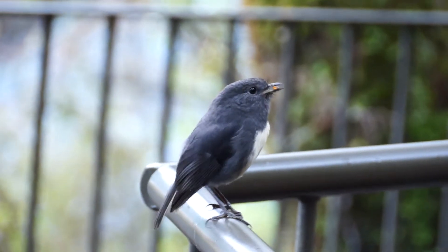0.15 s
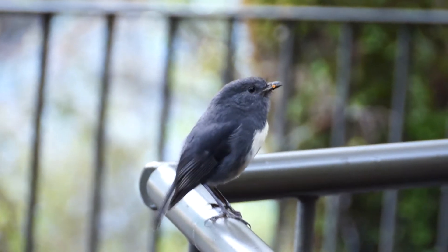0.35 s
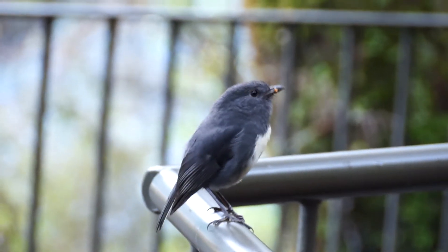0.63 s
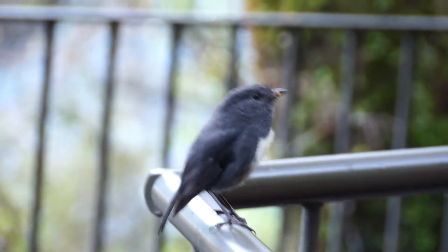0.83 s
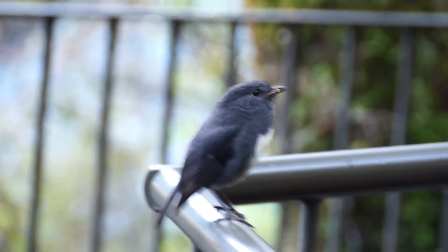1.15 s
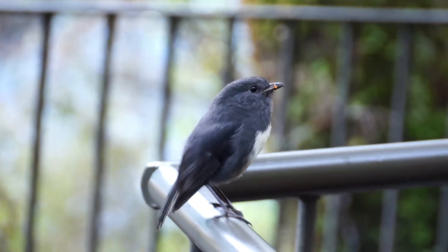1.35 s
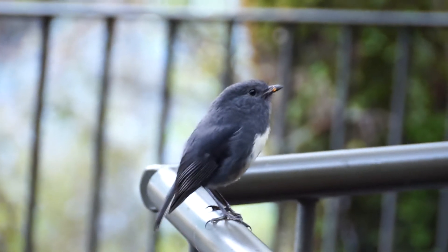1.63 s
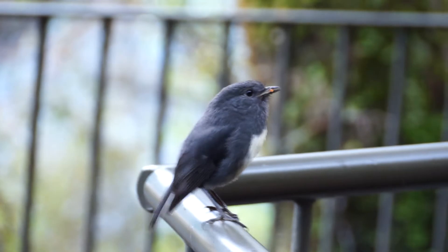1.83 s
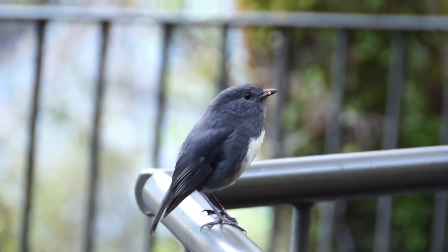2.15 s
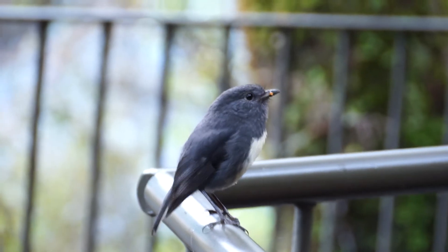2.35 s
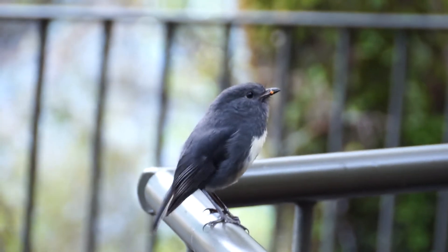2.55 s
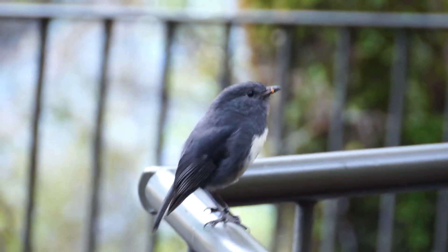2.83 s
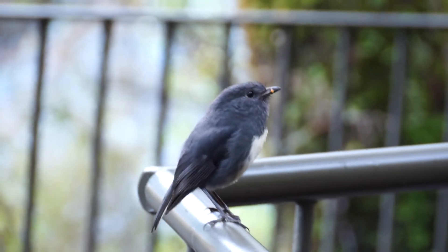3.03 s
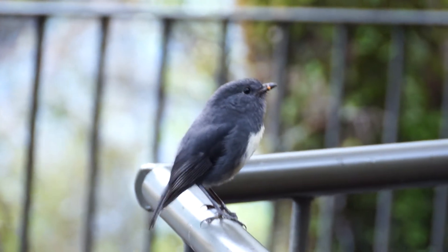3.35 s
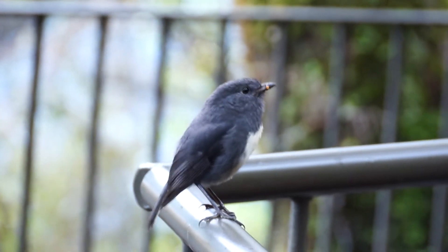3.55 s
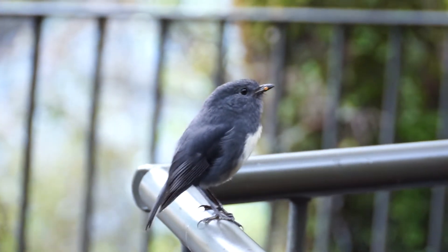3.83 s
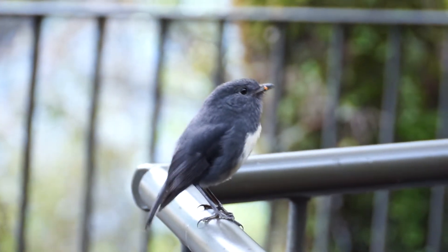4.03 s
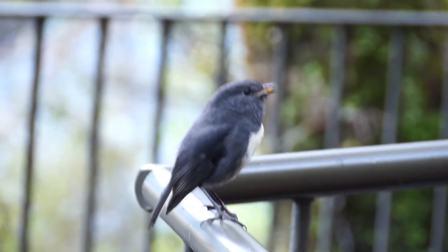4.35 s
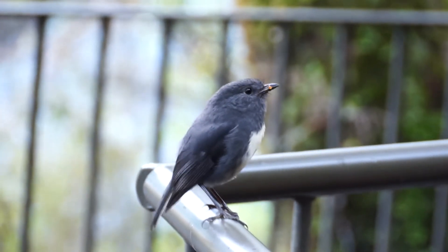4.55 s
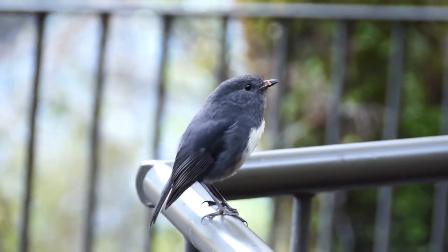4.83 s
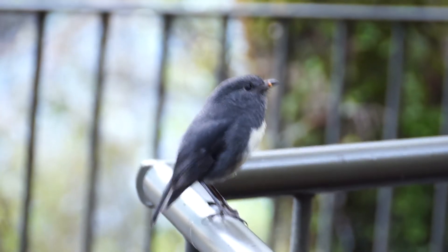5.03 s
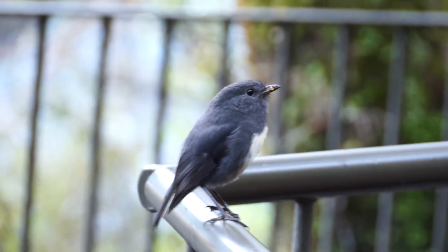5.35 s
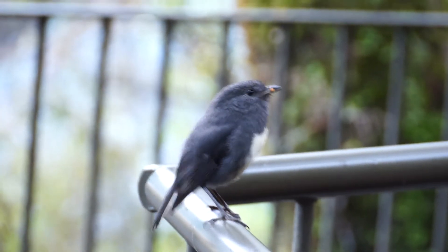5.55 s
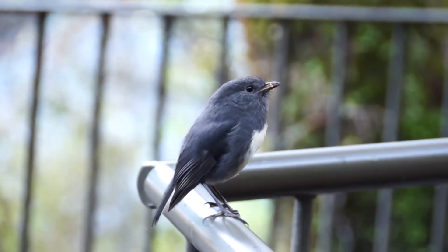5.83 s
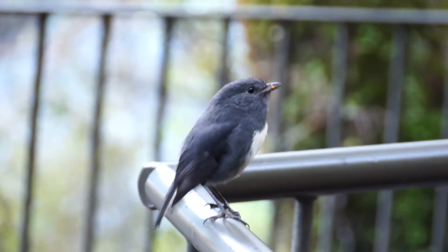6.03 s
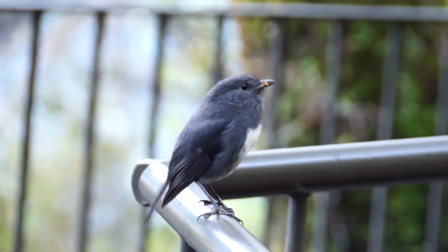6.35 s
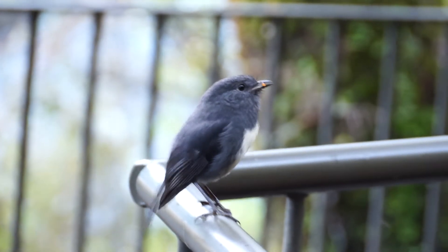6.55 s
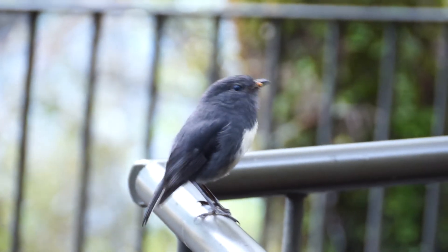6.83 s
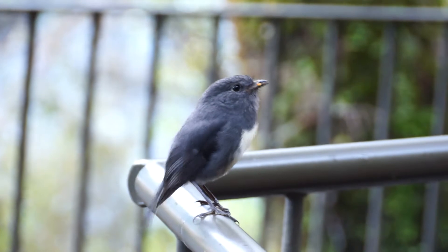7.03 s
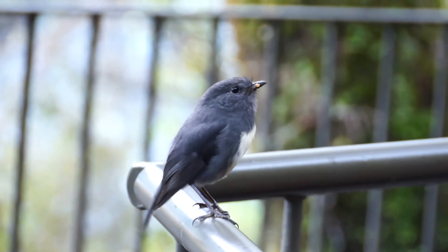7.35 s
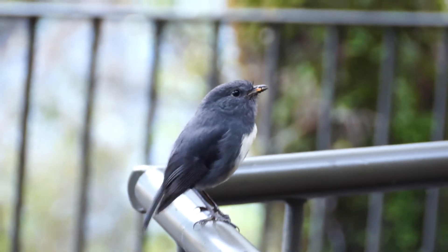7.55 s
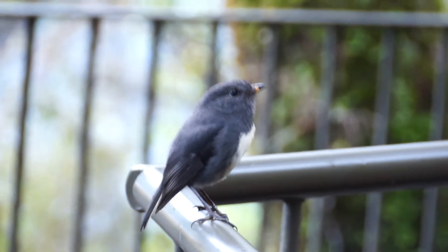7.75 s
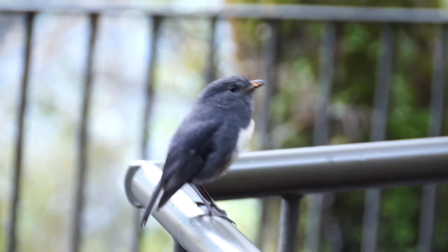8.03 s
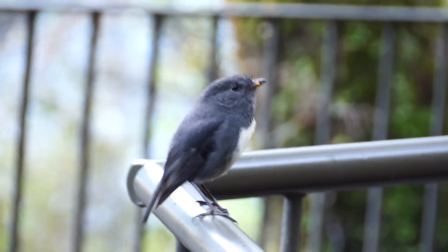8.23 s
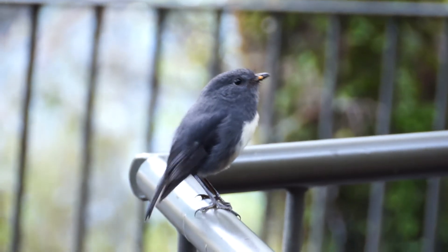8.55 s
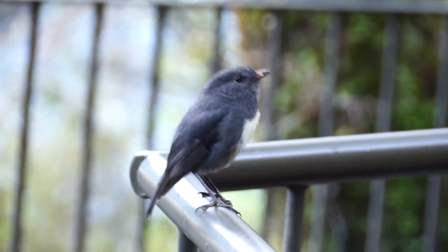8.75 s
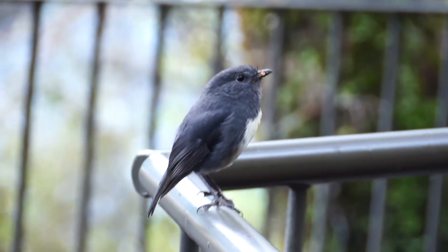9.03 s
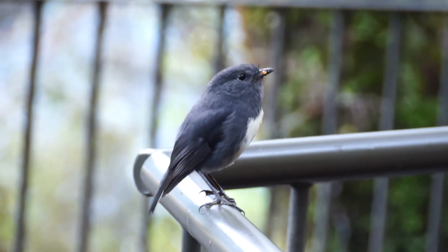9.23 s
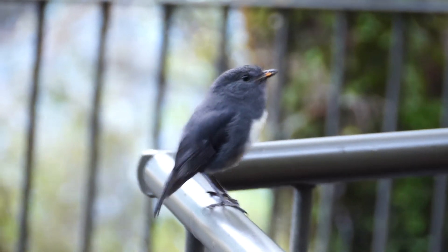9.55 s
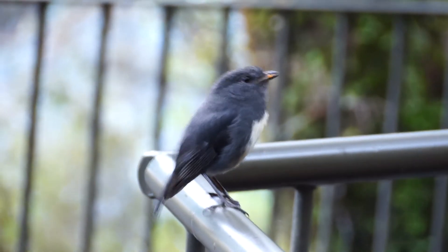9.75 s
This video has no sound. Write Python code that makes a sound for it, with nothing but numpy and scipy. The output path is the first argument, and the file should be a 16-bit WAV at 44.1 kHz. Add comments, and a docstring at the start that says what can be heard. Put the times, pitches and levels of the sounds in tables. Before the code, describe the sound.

Close robin song outdoors: runs of short repeated syllables, from piercing whistles to buzzy trills and paired chirps, with light woodland echo and soft background hush.

```python
"""Robin on a handrail

A robin sings a few metres from the stereo microphone, repeating most syllables before it changes to the next.
Its syrinx gives whistles, fast trills and harsher notes in which its two sides sound together.
Rail and ground echo the song closely, and trunks and leaves scatter it back.
Behind it all lies the steady far rush of the forest, shaped from noise."""
import sys
import numpy as np
from scipy import signal
from scipy.fft import rfft, irfft
from scipy.io import wavfile
from scipy.ndimage import uniform_filter1d

SR = 44100
rng = np.random.default_rng(int(sys.argv[2]) if len(sys.argv) > 2 else 0)


def materialize(psi):
    """Save the field psi as 16-bit PCM at rate SR to the path in sys.argv[1].

    A 1-D psi becomes a single channel; in a 2-D psi each row is a channel.
    """
    bounded = np.clip(np.atleast_2d(psi).T, -1, 1)
    quanta = np.round(bounded * 32767).astype(np.int16)
    wavfile.write(sys.argv[1], SR, quanta)


N = 436568
FREQS = np.maximum(np.fft.rfftfreq(N, 1 / SR), 1)

# single clear notes, by syllable: (time [s], pitch at the turn [Hz], level [dB])
CLEAR_NOTES = { "whistle": [(1.137, 3566, -25.5), (1.366, 3534, -25.5), (1.588, 3546, -24.5),
               (1.812, 3504, -23.5), (2.057, 3516, -25), (2.287, 3524, -24.5), (2.515, 3510, -24),
               (2.757, 3468, -23.5)], "wheep": [(2.978, 2370, -33)], "chup": [(7.243, 1720, -32),
               (7.4, 1643, -33)], "arch": [(9.6105, 5454, -25.5), (9.796, 5520, -28)]}


def clear_runs():
    """Runs of clear syllables, each sung by one side of the syrinx."""
    out = np.zeros(N)
    for name, rows in CLEAR_NOTES.items():
        for s, hz, db in rows:
            add(out, s, clear_note(name, hz, db))
    return out


# a high lift answered by a low dip:
# (time [s], lift pitch [Hz], lift level [dB], dip pitch [Hz], dip level [dB])
LIFT_DIPS = [(6.34, 4950, -25.5, 3130, -28), (6.563, 4910, -24.5, 3543, -24),
             (6.803, 4920, -24, 3556, -22.5), (7.031, 5250, -26.5, 3586, -22.5)]
# a low pip answered by a high peep:
# (time [s], pip pitch [Hz], pip level [dB], peep pitch [Hz], peep level [dB])
PIP_PEEPS = [(8.644, 3584, -23.5, 4644, -22.5), (8.8752, 3624, -21.5, 4560, -21.5),
             (9.141, 3550, -24.5, 4495, -21.5), (9.3869, 3706, -22, 4662, -21.5)]
DIP_AFTER_S, PEEP_AFTER_S = 0.035, 0.05


def couplets():
    """Pairs of clear syllables, the second following at a fixed delay."""
    out = np.zeros(N)
    kinds = (("lift", "dip", DIP_AFTER_S, LIFT_DIPS), ("pip", "peep", PEEP_AFTER_S, PIP_PEEPS))
    for first, second, after_s, rows in kinds:
        for s, first_hz, first_db, second_hz, second_db in rows:
            add(out, s, clear_note(first, first_hz, first_db))
            add(out, s + after_s, clear_note(second, second_hz, second_db))
    return out


# two-voiced notes, by syllable: (time [s], length [s], lower pitch at the turn [Hz], level [dB],
# upper voice against the lower, before the throat colours it [dB])
TWO_VOICED_NOTES = { "chip": [(-.007, .025, 4830, -36.5, 4.5), (.178, 0.021, 4776, -32.5, 5),
                    (.356, 0.02, 4790, -34, 5.5), (.535, 0.021, 4804, -34, 6.5),
                    (.726, 0.0202, 4784, -34.5, 5), (.923, 0.018, 4687, -33.5, 5.5)],
                    "tick": [(3.151, 0.016, 3990, -28, -10), (3.35, .018, 4280, -27, -10),
                    (3.544, 0.019, 4630, -26.5, -12), (3.726, 0.016, 4124, -28.5, -8),
                    (3.905, .022, 3940, -33, -3), (4.0955, 0.022, 4940, -27, -7)],
                    "tsip": [(6.042, .025, 5320, -34, 2.5), (6.1895, .022, 5420, -33.5, -1.5)]}


def two_voiced_notes():
    """Short harsh syllables in which both sides of the syrinx sound together."""
    out = np.zeros(N)
    for name, rows in TWO_VOICED_NOTES.items():
        for s, length_s, hz, db, upper_db in rows:
            _, pitch, level_db = gesture(name, length_s, hz, db)
            add(out, s, two_voices(name, pitch, level_db, upper_db))
    return out


# trills: (time [s], length [s], pitch at the turn [Hz], level [dB], swing rate [Hz])
TRILLS = [(4.944, .089, 4040, -23.5, 59.4), (5.213, 0.092, 3840, -24.5, 60.7),
          (5.4875, .096, 3866, -24, 57.55), (5.7701, 0.097, 3940, -23.5, 60.9)]
# the throat stays tuned to the middle of a trill, so pitches away from it are softer:
# (centre [Hz], reach [Hz], level change at that reach [dB])
TRILL_THROAT = (3800, 870, -5)
# average swing to either side, narrowing from start to end
TRILL_FIRST_SWING_HZ, TRILL_LAST_SWING_HZ = 816, 596


def trills(uneven_db=3.0, uneven_swing=0.16):
    """Syllables whose pitch swings about sixty times a second, unevenly in width and strength."""
    out = np.zeros(N)
    throat_hz, reach_hz, loss_db = TRILL_THROAT
    for s, length_s, hz, db, rate_hz in TRILLS:
        t, pitch, level_db = gesture("trill", length_s, hz, db)
        n = len(t)
        depth_hz = np.linspace(TRILL_FIRST_SWING_HZ, TRILL_LAST_SWING_HZ, n)
        depth_hz = depth_hz * (1 + uneven_swing * waver(n, rate_hz=58))
        pitch = pitch + depth_hz * np.cos(2 * np.pi * rate_hz * t)
        throat_db = loss_db * ((pitch - throat_hz) / reach_hz) ** 2
        level_db = level_db + throat_db + uneven_db * waver(n, rate_hz=147)
        add(out, s, clear_voice("trill", pitch, level_db))
    return out


# quavering two-voiced notes: (time [s], length [s], lower pitch after the scoop [Hz], level [dB],
# upper voice against the lower, before the throat colours it [dB], first swing to either side [Hz])
ZREES = [(4.338, .095, 4260, -30, -5.5, 472), (4.637, 0.099, 4630, -34, 0, 300)]
# they scoop up to their pitch, then creep higher as they fade
ZREE_SCOOP_S, ZREE_SCOOP_RATIO, ZREE_END_HZ = .014, .74, 5070
ZREE_ONSET_DB, ZREE_FADE_DB, QUAVER_HZ = -26, -13, 59.4


def zrees():
    """Buzzy notes of both sides that scoop up, overshoot and settle in a dying quaver."""
    out = np.zeros(N)
    for s, length_s, hz, db, upper_db, depth_hz in ZREES:
        t = np.arange(int(length_s * SR)) / SR
        stages = [0, ZREE_SCOOP_S, length_s]
        pitch = np.interp(t, stages, [ZREE_SCOOP_RATIO * hz, hz, ZREE_END_HZ])
        quaver = np.cos(2 * np.pi * QUAVER_HZ * (t - ZREE_SCOOP_S))
        swing_hz = np.interp(t, stages, [0, depth_hz, 0]) * quaver
        push_db = np.interp(t, [0, ZREE_SCOOP_S / 2, length_s], [ZREE_ONSET_DB, 0, ZREE_FADE_DB])
        add(out, s, two_voices("zree", pitch + swing_hz, db + push_db, upper_db))
    return out


# a held top note that tumbles down in a quickening trill: (time [s], hold [s], fall [s],
# last crest [Hz], swing to either side [Hz], first swing rate [Hz], last swing rate [Hz],
# held level [dB], early fall [dB], middle [dB], late [dB], crests softer and troughs louder by [dB])
CASCADES = [(7.596, 0.029, 0.11, 6160, 914, 53.3, 60, -36.5, -48, -37.5, -36.5, 8.5),
            (7.949, .008, .145, 6370, 694, 54.6, 69.8, -30.5, -34, -37, -37, 1.5),
            (8.32, .021, .112, 6530, 630, 51.7, 72.9, -30, -32.5, -38, -41, 0.5)]
# the top note arches over its pitch:
# (start offset [Hz], turn [share of the hold], end offset [Hz])
TOP_NOTE_ARCH = (-350, 0.45, -200)
CASCADE_TOP_HZ, CASCADE_CURVATURE, CASCADE_MIDDLE_SHARE = 7890, 1.4, 0.59
CASCADE_ATTACK_S, CASCADE_ONSET_DB = .008, -6


def cascades():
    """A thin top note is held, then swings downward ever faster while its crests sink and level out."""
    out = np.zeros(N)
    for (s, hold_s, fall_s, end_hz, depth_hz, first_hz, last_hz,
         held_db, early_db, middle_db, late_db, crest_db) in CASCADES:
        t = np.arange(int((hold_s + fall_s) * SR)) / SR
        fall = np.clip((t - hold_s) / fall_s, 0, 1)
        top_hz = CASCADE_TOP_HZ + arc(np.minimum(t / hold_s, 1), *TOP_NOTE_ARCH, 2)
        turns = fall_s * fall * (first_hz + (last_hz - first_hz) * fall / 2)
        swing = np.cos(2 * np.pi * turns)
        crest_hz = end_hz + (top_hz - end_hz) * (1 - fall) ** CASCADE_CURVATURE
        pitch = crest_hz - depth_hz * (1 - swing)
        fall_db = np.interp(fall, [0, CASCADE_MIDDLE_SHARE, 1], [early_db, middle_db, late_db])
        # tighter membranes move less: each crest is softer than each trough
        fall_db = fall_db - crest_db * swing
        held = np.clip(1 - 2 * first_hz * (t - hold_s), 0, 1)  # gives way over the first half swing
        attack_db = CASCADE_ONSET_DB * np.maximum(1 - t / CASCADE_ATTACK_S, 0)
        level_db = held * held_db + (1 - held) * fall_db + attack_db
        add(out, s, clear_voice("cascade", pitch, level_db))
    return out


# length of each clear syllable [s]
CLEAR_LENGTHS = {"whistle": 0.063, "lift": 0.018, "dip": 0.027, "pip": 0.0168, "peep": 0.023, "arch": .025,
                 "wheep": .046, "chup": .0265}


def clear_note(name, hz, db):
    """One clear syllable at its usual length."""
    _, pitch, level_db = gesture(name, CLEAR_LENGTHS[name], hz, db)
    return clear_voice(name, pitch, level_db)


# slide of pitch through a turning point, by syllable:
# (start [ratio to the turn], turn [share of length], end [ratio to the turn], curvature [exponent])
SLIDES = {"whistle": (0.998, 0.286, 1.144, 0.942), "lift": (.845, .85, 1.0, 2.5),
          "dip": (1.197, 0.486, 1.07, 1.65), "pip": (0.91, 0.48, 0.878, 2.23),
          "peep": (0.919, 0.89, .99, 1.48), "arch": (0.54, 0.42, 0.6, 1.4), "chup": (1.93, .95, .99, 1.7),
          "wheep": (0.66, 0.46, 1.15, 1.3), "chip": (.98, 0.43, 1.227, 1.02),
          "tick": (0.76, 0.214, 0.45, 1.4), "tsip": (1, 0.25, .885, 1.2), "trill": (0.78, 0.277, .93, 1.75)}
# push of air, by syllable: (onset [dB from crest], crest [share of length], end [dB from crest])
PUSHES = {"whistle": (-1.5, 0.79, -14), "lift": (-5.5, 0.33, -16), "dip": (-3.5, 0.63, -6.5),
          "pip": (-1.5, 0.61, -13), "peep": (-2, 0.51, -29), "arch": (-10, 0.21, -7),
          "chup": (-5.5, .4, -15), "wheep": (-23.5, 0.41, -14), "chip": (-31, 0.34, -4.5),
          "tick": (-14.5, .52, -18.5), "tsip": (-15, .45, -1.9), "trill": (-6, 0.14, -9.5)}
PUSH_CURVATURE = 1.44


def gesture(name, length_s, hz, db):
    """Time, pitch and level of one syllable: one slide of tension on one push of air."""
    t = np.arange(int(length_s * SR)) / SR
    share = t / length_s
    start, turn, end, curvature = SLIDES[name]
    pitch = hz * (1 + arc(share, start - 1, turn, end - 1, curvature))
    level_db = db + arc(share, *PUSHES[name], PUSH_CURVATURE)
    return t, pitch, level_db


def arc(share, start, turn, end, curvature):
    """A curve from start to zero at the turn, then on to end."""
    turn = np.clip(turn, .01, .99)
    before = np.maximum(1 - share / turn, 0)
    after = np.maximum((share - turn) / (1 - turn), 0)
    return start * before ** curvature + end * after ** curvature


# overtones of each syllable before throat and beak colour them: (second [dB], third [dB])
TIMBRES = {"whistle": (-29.5, -35.5), "lift": (-28, -43), "dip": (-28.5, -33), "pip": (-30, -36.5),
           "peep": (-27.5, -34), "arch": (-26, -37), "wheep": (-11, -24.5), "chup": (-20.5, -30),
           "chip": (-19, -38.5), "tick": (-21, -26), "tsip": (-18.5, -35.5), "zree": (-20, -42.5),
           "trill": (-28, -32), "cascade": (-24, -38)}


def clear_voice(name, hz, db):
    """One side of the syrinx sings a near sine with two weak overtones."""
    phase = vibrate(hz)
    second_db, third_db = TIMBRES[name]
    tones = np.sin(phase) + overtone(2 * phase, second_db) + overtone(3 * phase, third_db)
    return airflow(db) * tones


# pitch of the upper voice over the lower, by syllable: (at the start [ratio], at the end [ratio])
INTERVALS = {"chip": (1.374, 1.274), "tick": (1.28, 1.5), "tsip": (1.44, 1.24), "zree": (1.52, 1.3)}


def two_voices(name, hz, db, upper_db):
    """Both sides sing at once; sharing one airflow, they also make sum and difference tones."""
    second_db, third_db = TIMBRES[name]
    low = vibrate(hz, jitter=0.022)
    high = vibrate(hz * np.linspace(*INTERVALS[name], len(hz)), jitter=0.0081)
    tones = np.sin(low) + overtone(high, upper_db)  # the throat colours the upper voice too
    tones += overtone(2 * low, second_db) + overtone(3 * low, third_db)
    tones += overtone(2 * high, second_db + upper_db - 3)
    tones += overtone(low + high, second_db + upper_db - 4.5)
    tones += overtone(2 * low - high, third_db + upper_db)
    return airflow(db) * tones


def vibrate(hz, jitter=0.0037):
    """Phase of one side of the syrinx, at a slightly unsteady pitch."""
    unsteady_hz = hz * (1 + jitter * waver(len(hz), rate_hz=618))
    return 2 * np.pi * np.cumsum(unsteady_hz) / SR


# how well throat and beak pass the overtones: (frequency [Hz], gain [dB])
BEAK = [(3300, 15), (4700, 4.5), (5600, -6.5), (6500, -1.5), (7300, -1.5), (8200, 8.5), (9200, 7),
        (12000, 3.5), (13200, -6), (15000, 2.5)]


def overtone(phase, db):
    """One overtone, coloured by throat and beak as it slides."""
    hz = np.gradient(phase) * SR / (2 * np.pi)
    beak_db = np.interp(hz, *np.transpose(BEAK))
    return np.sin(phase) * undb(db + beak_db) * (hz < SR / 2)


def airflow(db, shimmer_db=.4, edge_s=.0026):
    """Loudness of a note: a quick start and stop, with a slight shimmer throughout."""
    n = len(db)
    to_edge = np.minimum(np.arange(n), np.arange(n)[::-1])
    edge = np.clip(to_edge / (edge_s * SR), 0, 1)
    shimmer = shimmer_db * waver(n, rate_hz=500)
    return np.sqrt(2) * np.sin(edge * np.pi / 2) * undb(db + shimmer)  # sqrt(2): level is a sine's RMS


# hard surfaces close by, against the direct sound: (delay [s], left level [dB], right level [dB])
NEAR_ECHOES = [(.0031, -20, -20), (.0082, -12.5, -12.5), (.0115, -20, -20), (.031, -22, -22)]
# direct sound at the microphone: (frequency [Hz], left minus right [dB])
BALANCE = [(2000, 1.5), (2900, -7), (3300, 2), (3800, 1), (4800, 3.5), (5900, 1), (6400, -1.5), (7100, 4.5),
           (7600, 0), (8500, -0.5), (13000, 8.5), (15000, -26.5)]


def near_paths(song, left_lag_s=.000036):
    """The direct sound reaches the right side a moment sooner; rail and ground echo it closely."""
    half_db = across(BALANCE) / 2
    left = undb(half_db) * np.exp(-2j * np.pi * FREQS * left_lag_s)
    paths = np.array([left, undb(-half_db)])
    echoes = 0
    for s, left_db, right_db in NEAR_ECHOES:
        echoes = echoes + undb([[left_db], [right_db]]) * np.exp(-2j * np.pi * FREQS * s)
    return irfft(rfft(song) * paths * (1 + echoes), N)


# strength of the scattered song; high notes beam away from the microphone, into the trees:
# (frequency [Hz], gain [dB])
SCATTER = [(1500, -12.5), (2600, -0.5), (3600, -9.5), (4600, -8), (5600, 2), (7000, -5.5), (9000, -8),
           (15000, 6.5)]


def trees(song, t60_s=0.34, far_t60_s=0.99, far_db=-21, build_s=0.0009):
    """Many small echoes from trunks and leaves, different at each ear, with a faint far tail."""
    t = np.arange(SR) / SR
    near_decay = undb(-60 * t / t60_s)
    far_decay = undb(far_db - 60 * t / far_t60_s)
    build = 1 - np.exp(-(t / build_s) ** 2)
    # cubed noise is sparser: a few strong echoes among many weak ones
    echoes = rng.standard_normal((2, SR)) ** 3 * (near_decay + far_decay) * build
    echoes = echoes / np.sqrt(np.sum(echoes ** 2, axis=1, keepdims=True))
    sent = irfft(rfft(song) * undb(across(SCATTER)), N)
    return signal.fftconvolve(sent[None], echoes, axes=1)[:, :N]


# spectrum of the forest, only its shape: (frequency [Hz], relative density [dB])
FOREST = [(18, -70), (30, -37), (88, -27.5), (145, -15), (259, -2.5), (499, 0), (760, 0.5), (962, -2),
          (1220, -4), (1320, -5), (1760, -8.5), (2480, -12), (2980, -14), (5040, -19), (16000, -24.5)]
# approximate likeness of left and right: (frequency [Hz], correlation [-1 to 1])
FOREST_LIKENESS = [(40, .3), (140, 0.8), (300, 0.76), (640, 0.43), (1400, 0.0015), (3000, 0), (15000, 0.11)]
FOREST_DB = -55  # level of the part shared by both sides


def forest(swell_db=0.84):
    """A far rush of noise that barely swells, most alike at both ears in the bass, with a thin hiss above."""
    mid, side = rfft(rng.standard_normal((2, N))) * undb(across(FOREST))
    likeness = np.clip(across(FOREST_LIKENESS), -1, 1)
    side_gain = np.sqrt((1 - likeness) / (0.96 + likeness))
    mid, side = irfft(mid, N), irfft(side * side_gain, N)
    level = undb(FOREST_DB + swell_db * waver(N, rate_hz=0.74))
    return np.array([mid + side, mid - side]) / np.std(mid) * level


def undb(db):
    """Decibels to gain."""
    return 10 ** (np.asarray(db) / 20)


def across(points):
    """(frequency [Hz], value) points joined on a log-frequency axis."""
    hz, value = np.transpose(points)
    return np.interp(np.log(FREQS), np.log(hz), value)


def add(track, s, sound):
    """Mix a sound into the track from time s, dropping what falls outside."""
    at = int(s * SR) + np.arange(len(sound))
    inside = (at >= 0) & (at < N)
    track[at[inside]] += sound[inside]


def waver(n, rate_hz):
    """Smooth chance with a spread near 1."""
    k = max(int(SR / rate_hz), 1)
    steps = np.repeat(rng.standard_normal(n // k + 1), k)
    return uniform_filter1d(steps, k)[:n]


def scene(direct_db=1.0):
    """The bird, its echoes and the forest."""
    background = forest()
    song = clear_runs() + couplets() + two_voiced_notes() + trills() + zrees() + cascades()
    return undb(direct_db) * near_paths(song) + trees(song) + background


def record(dry, top_hz=16000):
    """The recorder cuts the very top with a steep low-pass."""
    low_pass = signal.ellip(10, .2, 70, top_hz, fs=SR, output="sos")
    return signal.sosfilt(low_pass, dry)


dry = scene()
out = record(dry)
materialize(out)
```